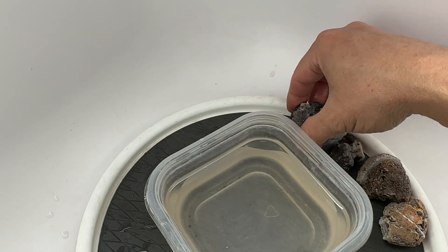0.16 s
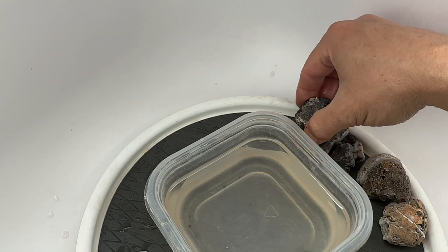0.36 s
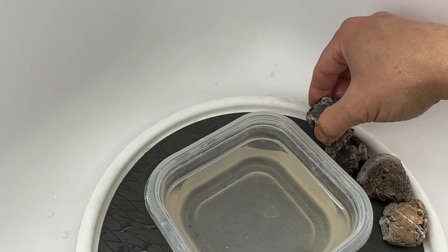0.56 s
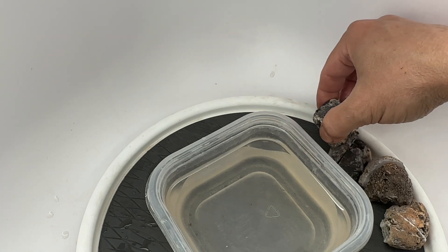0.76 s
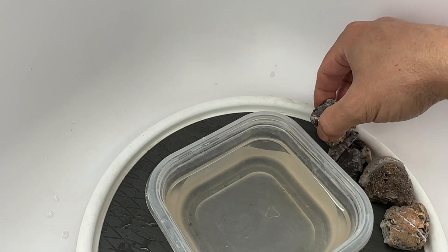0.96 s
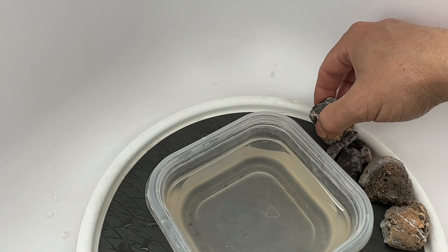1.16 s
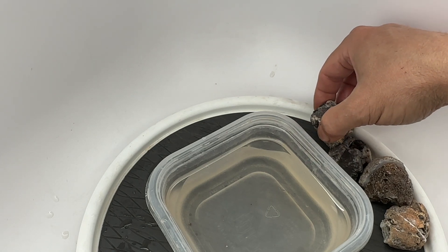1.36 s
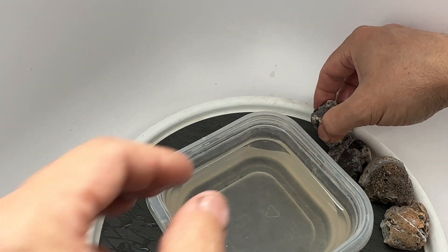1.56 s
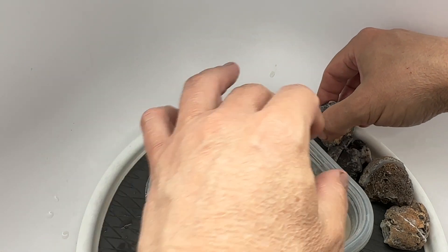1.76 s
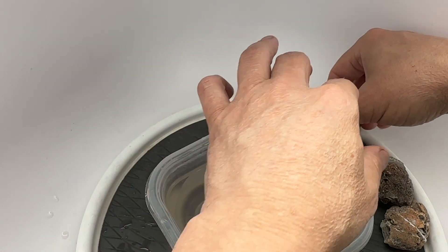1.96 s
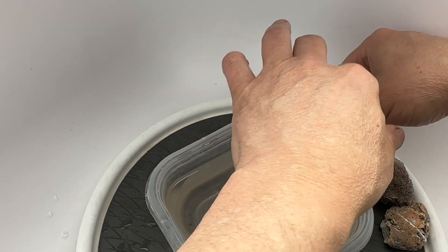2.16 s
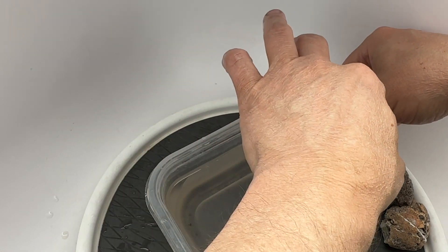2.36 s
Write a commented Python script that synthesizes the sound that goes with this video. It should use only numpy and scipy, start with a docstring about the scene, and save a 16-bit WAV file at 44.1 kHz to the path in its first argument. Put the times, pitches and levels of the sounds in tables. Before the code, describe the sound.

Rough stones clack and knock against a plastic tub on a table, busiest in the first second with one sharp click around half a second, then sparse, with another small cluster near two seconds; close, small room.

```python
"""In a small room, rough stones are shifted by hand beside a plastic tub on a table.
Each contact is a short filtered click, plus ringing modes for the hollow tub and the thudding table.
Some stones judder on the plastic: uneven pulses drive the tub and table. Sliding faces shed grit:
random grains in coloured noise. Slow thumps boom in the table, over a low room rumble and a wavering hum."""
import sys
import numpy as np
from scipy import signal
from scipy.fft import rfft, irfft, next_fast_len
from scipy.io import wavfile
from scipy.ndimage import uniform_filter1d

SR = 44100
rng = np.random.default_rng(int(sys.argv[2]) if len(sys.argv) > 2 else 0)


def store_pcm(level_fs):
    """Save levels as 16-bit WAV."""
    pcm = np.round(np.clip(level_fs, -1, 1) * 32767).astype(np.int16)
    wavfile.write(sys.argv[1], SR, np.atleast_2d(pcm).T)


N = 105840
T = np.arange(SR // 3) / SR  # time axis of one contact

# Levels in the tables are relative: fixed boosts, filters and the room come later.
# stone contacts [t/s, click level/dB, click treble cut f/Hz, tub level/dB, tub favoured f/Hz, table level/dB]
CONTACTS = [ (0.077, -40.5, 5650, -48, 1280, -43), (0.2145, -86, 3060, -42.5, 1060, -50.5),
            (0.3397, -55, 9150, -42, 1140, -48.5), (0.4366, -40.5, 2460, -34, 1280, -46.5),
            (0.4394, -41, 2400, -33.5, 600, -40.5), (0.46, -44, 7840, -36, 1050, -39),
            (0.4645, -34, 7770, -38.5, 1050, -41.5), (0.503, -37, 6490, -48.5, 1060, -39),
            (0.5212, -43.5, 7000, -47, 1140, -46), (0.5305, -40.5, 6460, -58.5, 938, -49),
            (.5460, -24.5, 10300, -43, 1216, -42), (0.5736, -18.5, 14600, -37.5, 1270, -30),
            (0.6218, -35, 6950, -37.5, 1106, -41.5), (0.6607, -30, 3610, -33.5, 1303, -40),
            (0.7117, -53.5, 3000, -42.5, 1200, -47), (0.8242, -50.5, 4000, -41, 1250, -51),
            (.8690, -58, 2900, -41.5, 1355, -47), (.8801, -59.5, 7000, -39.5, 1228, -45),
            (.9680, -68, 7210, -42.5, 957, -44), (1.062, -85, 3000, -54.5, 1000, -60.5),
            (1.111, -78.5, 2860, -57, 1600, -60.5), (1.140, -77, 3000, -50.5, 1332, -54),
            (1.304, -69, 6000, -45, 950, -44), (1.344, -32, 6340, -37, 1110, -39),
            (1.6856, -56.5, 4430, -54, 1200, -58.5), (1.7606, -44, 5500, -57, 1450, -53.5),
            (1.853, -75, 3000, -48, 1165, -76.5), (1.9732, -51, 7960, -55.5, 1336, -48.5),
            (1.993, -40, 8060, -45.5, 1360, -52), (2.032, -47, 5990, -38.5, 1265, -48),
            (2.0494, -48, 7160, -62, 1115, -39), (2.0552, -33, 10400, -35, 1243, -36.5),
            (2.0581, -40, 3000, -32.5, 844, -47), (2.0626, -38.5, 2800, -33.5, 719, -32),
            (2.332, -75.5, 3000, -58.5, 1140, -63.5)]
# stones juddering on the plastic [t/s, length/s, tub level/dB, table level/dB, tub favoured f/Hz]
JUDDERS = [(0.171, 0.032, -47.5, -44.5, 1080), (0.222, 0.059, -45, -43, 1040),
           (0.348, 0.036, -44.5, -46, 1220), (.503, 0.073, -48.5, -44, 480),
           (0.791, 0.08, -46.5, -47.5, 1100), (0.878, 0.098, -56, -58.5, 1330),
           (1.286, 0.049, -47, -47.5, 996), (1.581, 0.018, -58, -55, 560), (1.635, 0.024, -67.5, -58, 560),
           (1.936, 0.091, -62, -53.5, 518), (2.287, 0.028, -60.5, -73, 950)]
# rough faces sliding over each other [t/s, length/s, level/dB]
SLIDES = [(0.008, 0.14, -61), (0.071, 0.14, -62), (0.224, 0.088, -70.5), (0.338, 0.055, -68),
          (0.427, 0.071, -56), (0.487, 0.064, -60.5), (0.764, 0.11, -64.5), (1.286, 0.056, -58),
          (1.778, 0.045, -65)]
# a stone's weight settling on the table [t/s, level/dB]
THUMPS = [(0.521, -47), (0.637, -40.5), (1.346, -46), (2.065, -36.5)]
# the click off the tub and the table [delay t/s, level/dB]
NEAR_ECHOES = [(.0022, -18.5), (.0047, -16.5)]
# level of the low hum over time [t/s, level/dB]
HUM_LEVEL = [(0, -67), (.7, -43.5), (.92, -68), (1.04, -48), (1.75, -56), (2.25, -48)]

# Ringing modes; t60 is the time to fade by 60 dB. Each contact shifts f and level a little.
# modes of a stone [f/Hz, level/dB, t60/s]
STONE_MODES = [(3270, 0, .025), (4400, -5, .04), (5700, 0.5, .025), (5680, 7, 0.044), (7080, -8.5, .03)]
# modes of the plastic tub [f/Hz, level/dB, t60/s]
TUB_MODES = [(575.6, -3, 0.06), (894.7, 3.5, 0.064), (1030.3, -2.5, 0.11), (1260, -2.5, 0.062),
             (1350, -5, 0.06), (2105, -11.5, 0.08)]
# modes of the table [f/Hz, level/dB, t60/s]
TABLE_MODES = [(254.5, -2.5, 0.25), (341.2, 1, 0.068), (437.7, -1, 0.1), (466.6, -3.5, 0.16),
               (560, -8.5, 0.14)]
# modes of the table top under a settling stone [f/Hz, level/dB, t60/s]
THUMP_MODES = [(110.6, -7, 0.65), (138, -2, 0.19), (254.8, -9.5, 0.12)]

# Colours: how strong each pitch region is, before overall scaling.
# stone click [f/Hz, level/dB]
CLICK_COLOUR = [(300, -13.5), (1600, -26), (3000, -14), (4000, -12), (5400, -3), (6800, -1.5), (7700, -11),
                (8700, -3), (9700, -17.5), (11000, -45), (13500, -16), (16000, -23)]
# short modes of the tub [f/Hz, level/dB]
TUB_COLOUR = [(150, -6.5), (420, -16.5), (680, -2), (1000, -6.5), (1350, -5.5), (1600, -12), (2100, -13),
              (2600, -27.5), (3300, -20), (5000, -55)]
# short modes of the table [f/Hz, level/dB]
TABLE_COLOUR = [(40, -28.5), (110, 5.5), (180, -4), (260, 0), (560, -3), (720, -11), (1500, -22.5),
                (5000, -68.5)]
# sliding grit [f/Hz, level/dB]
GRIT_COLOUR = [(400, -6), (1500, 6.5), (3200, -2.5), (4700, -8.5), (6500, -6), (9000, -9.5), (11000, -41),
               (14000, -23.5), (16000, -30.5)]
# room rumble [f/Hz, level/dB]
ROOM_COLOUR = [(25, -37), (36, -4.5), (55, -2.5), (80, -5), (118, -0.5), (170, -8), (260, -13), (340, -19),
               (480, -17.5), (700, -29.5), (1150, -29.5), (1700, -37.5), (4000, -48.5), (9000, -56.5),
               (11000, -72), (16000, -56)]
# left-right difference in the rumble [f/Hz, level/dB]
RUMBLE_SIDE_COLOUR = [(60, -15), (140, -18.5), (300, -8.5), (1000, -1.5)]

RUMBLE_DB, HUM_HZ = -51, 56.2
TUB_ROOM_T60_S, TABLE_ROOM_T60_S = .35, .42
TUB_T60_S, TABLE_T60_S = .03, .07  # short modes, before the extra fade in flurry()
TUB_RISE_S, TABLE_RISE_S = .0007, .0018
TUB_LAG_S, TABLE_LAG_S = 0.00065, 0.0016  # delay after the click
SPOT_Q, SPOT_DB = 6.1, 9.5  # how strongly the point of contact favours some of the tub's modes
STROKE_ATTACK, STROKE_RELEASE = 0.24, 0.45  # shares of a stroke's length
GRAINS_PER_S, GRAIN_SCATTER_DB, FINE_GRIT = 700, 6, .2
SLIP_HZ, SLIP_JITTER, SLIP_SCATTER_DB = 299.2, .5, 3  # the typical (median) gap is 1 / SLIP_HZ
SCATTER_DB, SCATTER_T60_S = -2, .035  # the click scattered by nearby stones
STONE_RING_DB = -7
LEFT_DB, LEFT_LEAD_S = 3, .00002  # left ear against right ear
TOP_HZ = 16000


def amp(db):
    """Turn decibels into gain."""
    return 10 ** (np.asarray(db) / 20)


def unit(x):
    """Scale to unit energy per channel, on average."""
    return x / np.sqrt(np.mean(np.sum(x ** 2, axis=-1)))


def fade(t, t60):
    """Die away smoothly, losing 60 dB in t60 seconds."""
    return np.exp(-np.log(1000) * t / t60)


def add(out, s, x):
    """Mix x into out from time s."""
    i = max(int(s * SR), 0)
    out[..., i:i + x.shape[-1]] += x[..., :max(N - i, 0)]


def colour(x, points):
    """Filter through the (f, level) points without any sound before the start."""
    n = 2 * next_fast_len(x.shape[-1])
    hz, db = np.array(points).T
    bins_hz = np.arange(n // 2 + 1) * SR / n
    level_db = np.interp(np.log(bins_hz + 1), np.log(hz), db)
    # folding the cepstrum forward gives the minimum-phase filter
    cepstrum = irfft(np.log(amp(level_db)))
    cepstrum[1:n // 2] *= 2
    cepstrum[n // 2 + 1:] = 0
    return irfft(rfft(x, n) * np.exp(rfft(cepstrum)))[..., :x.shape[-1]]


def pair(n, width):
    """Stereo noise: width 0 is the same in both ears, 1 unrelated above the bass, which stays in the middle."""
    mid, side = rng.standard_normal((2, n))
    side = signal.sosfilt(signal.butter(2, 220, "high", fs=SR, output="sos"), side)
    return np.array([mid + width * side, mid - width * side])


def rumble():
    """Low room noise, wider above the bass, with a wavering hum."""
    mid, side = colour(rng.standard_normal((2, N)), ROOM_COLOUR)
    side = colour(side, RUMBLE_SIDE_COLOUR)
    noise = unit(np.array([mid + side, mid - side])) * np.sqrt(N)
    t = np.arange(N) / SR
    waver = np.interp(t, np.linspace(0, t[-1], 16), rng.standard_normal(16))
    hum_hz = HUM_HZ * (1 + 0.017 * waver)
    hum = np.sin(2 * np.pi * np.cumsum(hum_hz) / SR)
    hum_db = np.interp(t, *np.array(HUM_LEVEL).T)
    return amp(RUMBLE_DB) * noise + amp(hum_db) * hum


def room(x, wet_db, t60, width):
    """The direct sound plus a diffuse tail from the walls, made of fading noise."""
    t = np.arange(SR) / SR
    build_up = 1 - np.exp(-(t / 0.012) ** 2)
    tail = unit(pair(SR, width) * fade(t, t60) * build_up)
    return x + amp(wet_db) * signal.fftconvolve(x, tail, axes=1)[:, :N]


def ring(modes, width):
    """Fading sine tones, tuned and weighted a little differently at every contact."""
    out = 0
    for hz, db, t60 in modes:
        detune, level_shift_db, spread = rng.standard_normal(3)
        ear_phase = width * spread * np.array([[.5], [-.5]])
        turn = 2 * np.pi * hz * (1 + .008 * detune) * T + ear_phase
        out = out + amp(db + level_shift_db) * np.sin(turn) * fade(T, t60)
    return unit(out)


def flurry(t60, width):
    """Many short modes dying together, spread evenly over frequency."""
    spectrum = rfft(pair(len(T), width) * fade(T, t60))
    power = uniform_filter1d(np.mean(np.abs(spectrum) ** 2, axis=0), size=40)
    even = irfft(spectrum / np.sqrt(power), len(T))
    return even * fade(T, T[-1])


def body(modes, points, t60, modes_db, width, rise_s):
    """Response of an object that soon stops ringing: a few clear modes among many short ones."""
    dense = unit(colour(flurry(t60, width), points))
    clear = amp(modes_db) * ring(modes, width)
    rise = 1 - np.exp(-T / rise_s)
    return unit((dense + clear) * rise)


def thumps():
    """The table top booms in a few low modes under a stone's weight."""
    out = np.zeros((2, N))
    rise = 1 - np.exp(-T / 0.00071)
    for s, db in THUMPS:
        boom = unit(ring(THUMP_MODES, width=0.15) * rise)
        add(out, s, amp(db + 33.0) * boom)
    return out


def table():
    """The dull thud of the table, from its low modes."""
    return body(TABLE_MODES, TABLE_COLOUR, t60=TABLE_T60_S, modes_db=-1, width=.4, rise_s=TABLE_RISE_S)


def tub(spot_hz):
    """The hollow knock of the plastic, with the pitches near spot_hz favoured by where it is touched."""
    x = body(TUB_MODES, TUB_COLOUR, t60=TUB_T60_S, modes_db=-3, width=0.98, rise_s=TUB_RISE_S)
    favoured = signal.lfilter(*signal.iirpeak(spot_hz, SPOT_Q, fs=SR), x)
    return unit(x + amp(SPOT_DB) * favoured)


def stroke(length):
    """Pressure of the hand: rises, holds, lets go."""
    u = np.linspace(0, 1, int(length * SR))
    return np.minimum(1, np.minimum(u / STROKE_ATTACK, (1 - u) / STROKE_RELEASE))


def grit():
    """Tiny grains catch unevenly as two rough faces slide: random spikes over a fine hiss."""
    out = np.zeros((2, N))
    for s, length, db in SLIDES:
        caught = rng.random(len(T)) < GRAINS_PER_S / SR
        grains = caught * amp(GRAIN_SCATTER_DB * rng.standard_normal(len(T)))
        hiss = colour(pair(len(T), width=0.31) * (grains + FINE_GRIT), GRIT_COLOUR)
        press = stroke(length)
        slide = unit(hiss[:, :len(press)] * press)
        add(out, s, amp(db) * np.sqrt(len(press)) * slide)
    return out


def judders():
    """A stone sticks and slips on the plastic; the uneven pulses drive the tub and the table."""
    out = np.zeros((2, N))
    for s, length, tub_db, table_db, spot_hz in JUDDERS:
        gap, size = rng.standard_normal((2, 64))
        slips = np.zeros(N)
        at = np.cumsum(np.exp(SLIP_JITTER * gap)) * SR / SLIP_HZ
        slips[at.astype(int) % N] = amp(SLIP_SCATTER_DB * size)
        press = stroke(length)
        push = (slips[:len(press)] * press)[None]
        for db, response in ((tub_db, tub(spot_hz)), (table_db, table())):
            # the tiny offset avoids dividing silence by zero
            driven = unit(signal.fftconvolve(push + 1e-12, response))
            add(out, s, amp(db) * np.sqrt(len(press)) * driven)
    return out


def click(bright_hz):
    """A sharp tick, its near echoes, scatter and a brief ring, with the treble cut above bright_hz."""
    tick = 1. * (T == 0)
    for delay, db in NEAR_ECHOES:
        add(tick, delay, amp([db]))
    tick = unit(colour(tick, CLICK_COLOUR))
    scatter = unit(colour(pair(len(T), width=0.12) * fade(T, SCATTER_T60_S), CLICK_COLOUR))
    x = tick + amp(SCATTER_DB) * scatter + amp(STONE_RING_DB) * ring(STONE_MODES, width=.7)
    treble_cut = signal.butter(N=3, Wn=min(bright_hz, SR / 2.2), fs=SR, output="sos")
    return unit(signal.sosfilt(treble_cut, x))


def knocks():
    """Every contact sounds in stone, tub and table, the last two slightly later."""
    in_stone, in_tub, in_table = np.zeros((3, 2, N))
    for s, click_db, bright_hz, tub_db, spot_hz, table_db in CONTACTS:
        add(in_stone, s, amp(click_db + 19.5) * click(bright_hz))
        add(in_tub, s + TUB_LAG_S, amp(tub_db + 25.5) * tub(spot_hz))
        add(in_table, s + TABLE_LAG_S, amp(table_db + 28) * table())
    return in_stone, in_tub, in_table


def scene():
    """Clicks and grit reach the left ear first and louder; the stones, tub and table ring in the room."""
    in_stone, in_tub, in_table = knocks()
    bright = in_stone + grit()
    # turning the phase of each frequency moves the left ear ahead by less than a sample
    hz = np.arange(N // 2 + 1) * SR / N
    early = irfft(rfft(bright[0]) * np.exp(2j * np.pi * hz * LEFT_LEAD_S), N)
    bright = np.array([early * amp(LEFT_DB / 2), bright[1] * amp(-LEFT_DB / 2)])
    stones = room(bright, wet_db=-16, t60=0.27, width=.9)
    plastic = room(in_tub + judders(), wet_db=-12.5, t60=TUB_ROOM_T60_S, width=0.44)
    thuds = room(in_table + thumps(), wet_db=-7.5, t60=TABLE_ROOM_T60_S, width=1.0)
    return stones + plastic + thuds + rumble()


def record(dry):
    """The top of the treble is cut by a steep filter."""
    return signal.sosfilt(signal.ellip(8, .2, 70, TOP_HZ, fs=SR, output="sos"), dry)


dry = scene()
out = record(dry)
store_pcm(out)
```